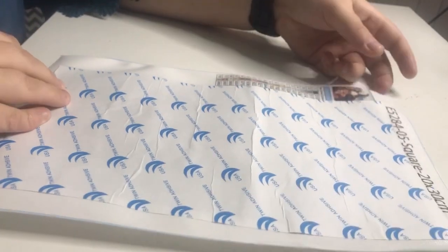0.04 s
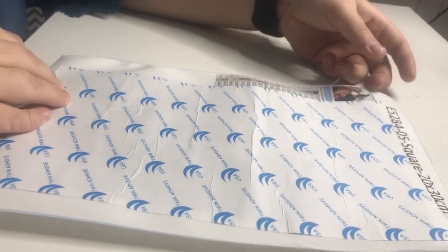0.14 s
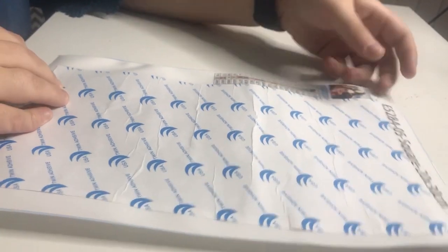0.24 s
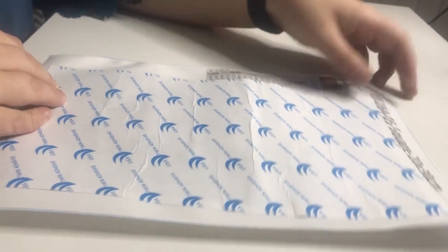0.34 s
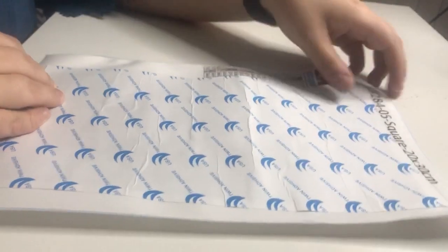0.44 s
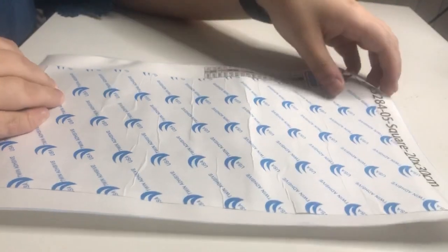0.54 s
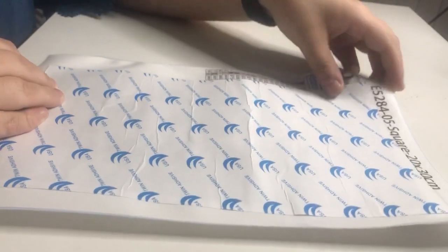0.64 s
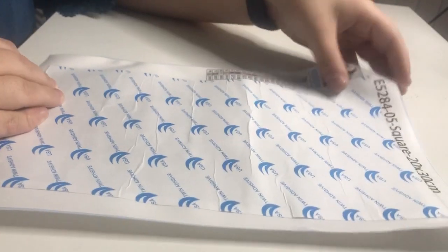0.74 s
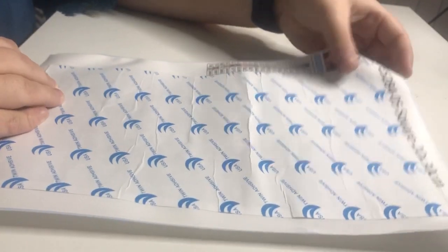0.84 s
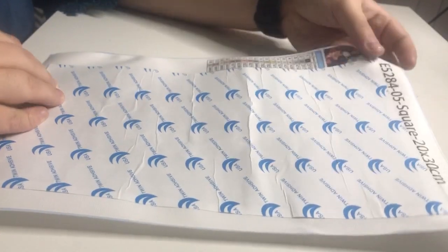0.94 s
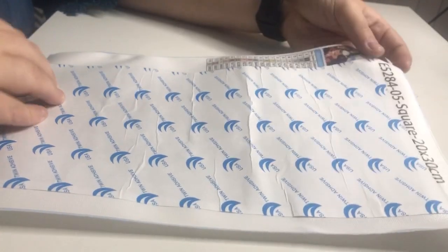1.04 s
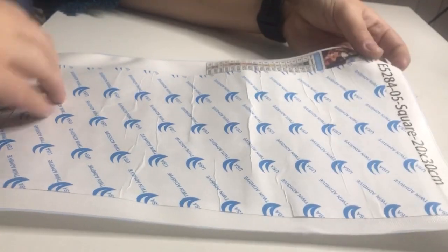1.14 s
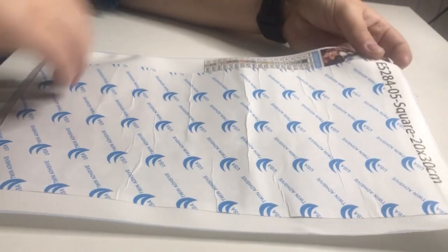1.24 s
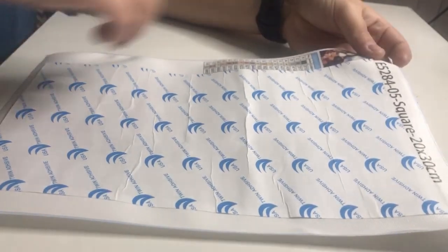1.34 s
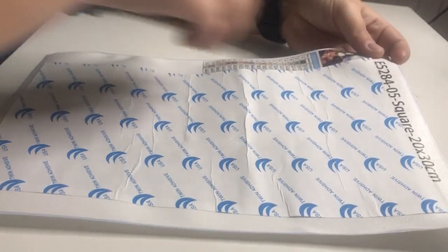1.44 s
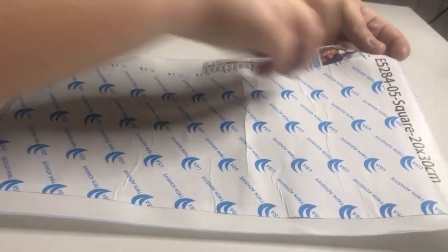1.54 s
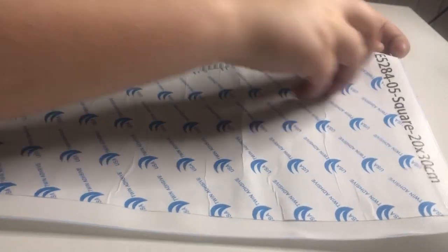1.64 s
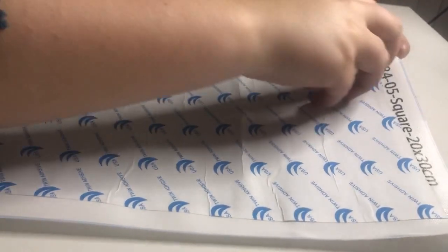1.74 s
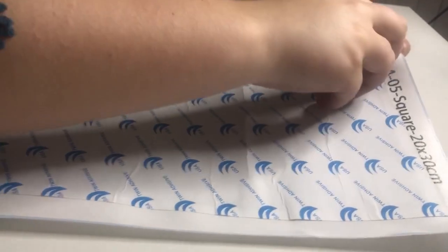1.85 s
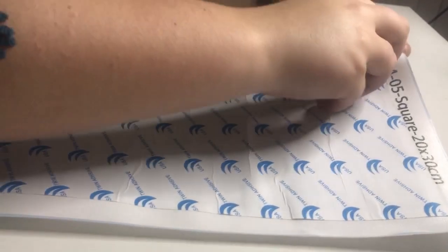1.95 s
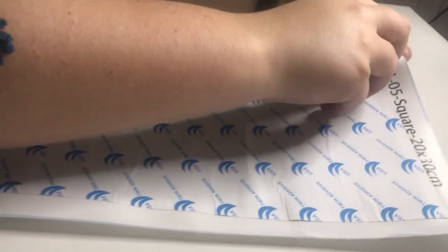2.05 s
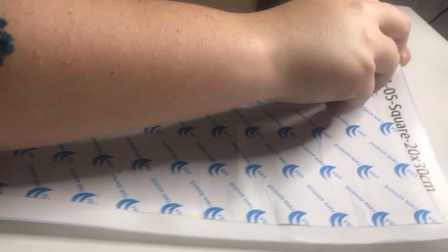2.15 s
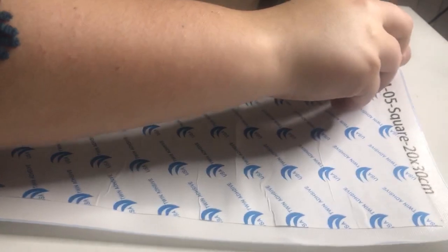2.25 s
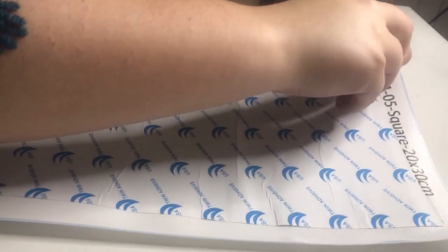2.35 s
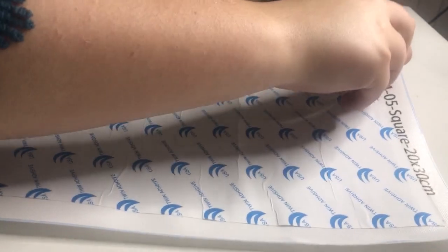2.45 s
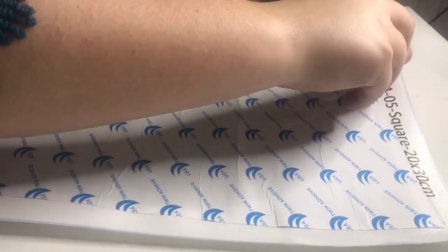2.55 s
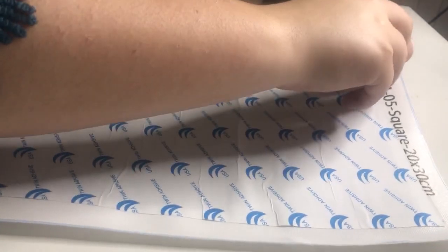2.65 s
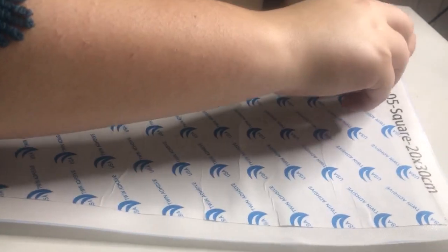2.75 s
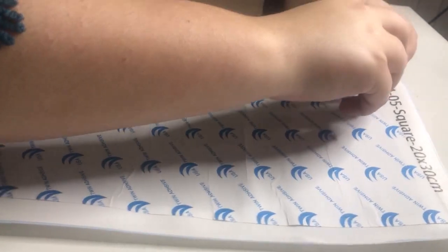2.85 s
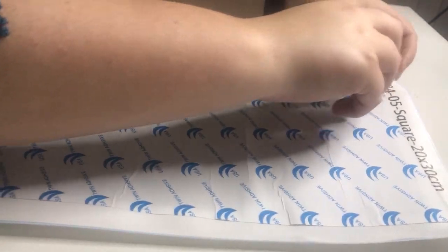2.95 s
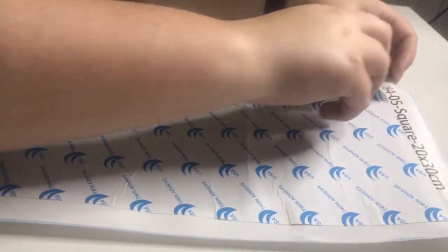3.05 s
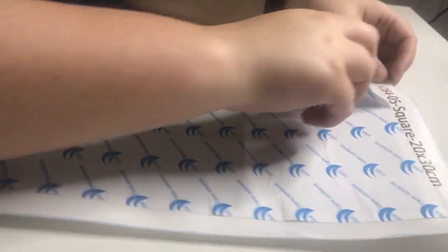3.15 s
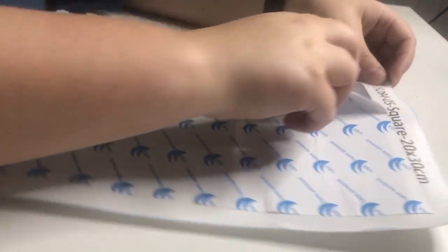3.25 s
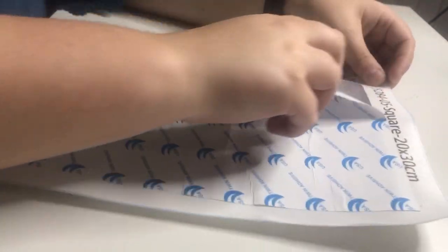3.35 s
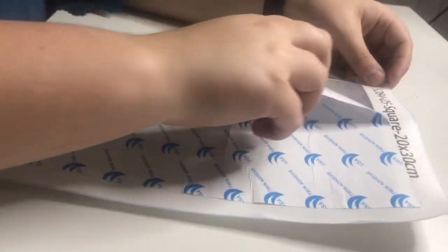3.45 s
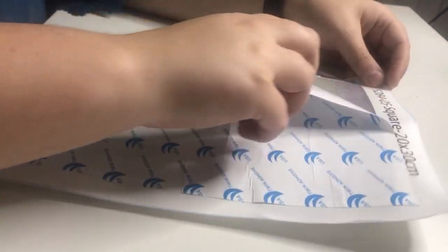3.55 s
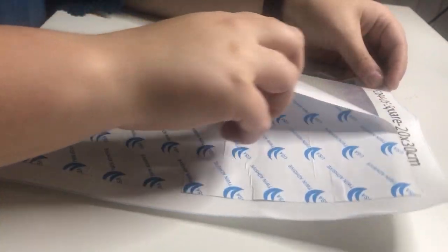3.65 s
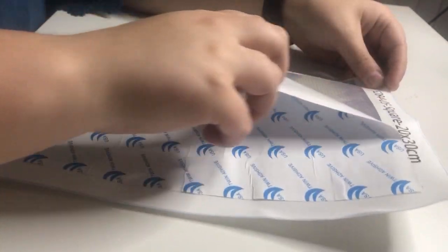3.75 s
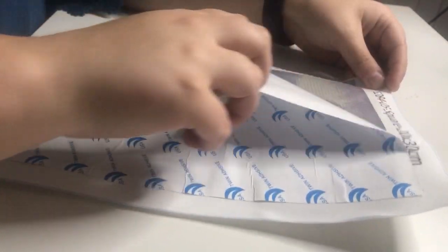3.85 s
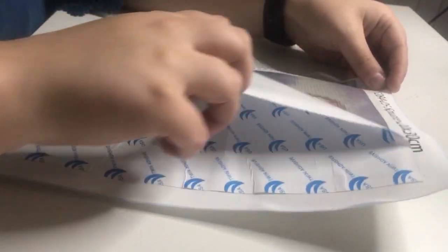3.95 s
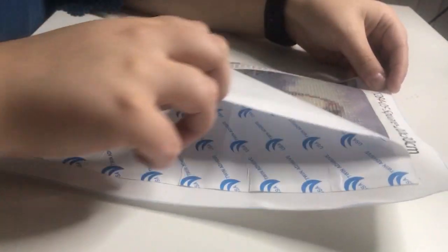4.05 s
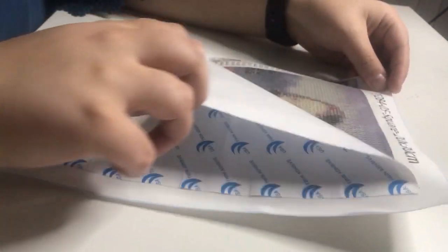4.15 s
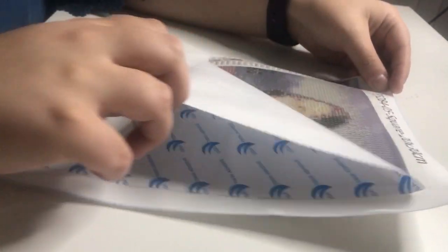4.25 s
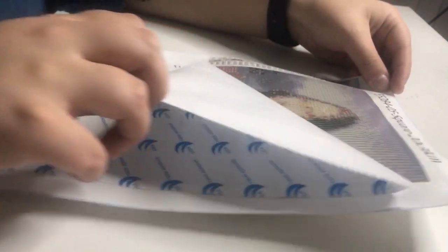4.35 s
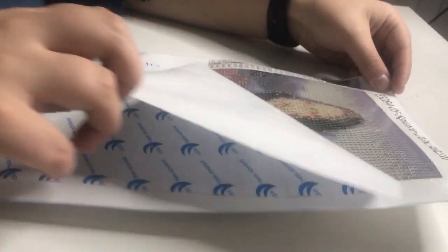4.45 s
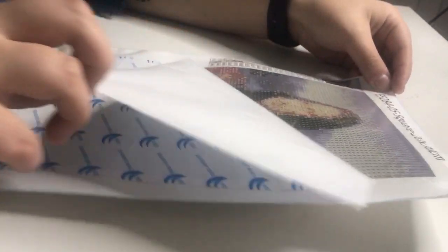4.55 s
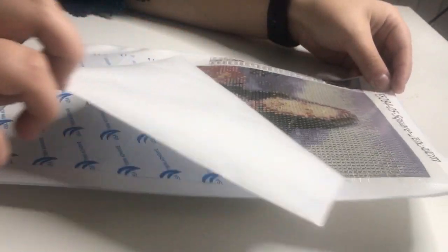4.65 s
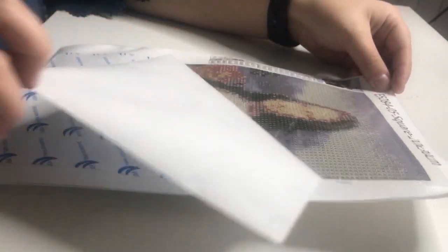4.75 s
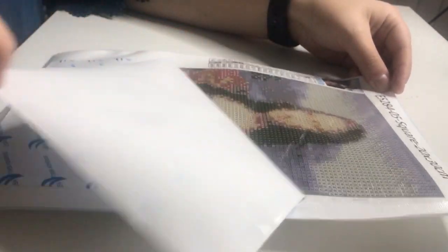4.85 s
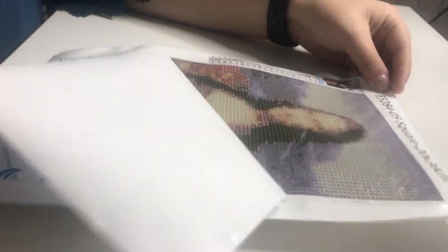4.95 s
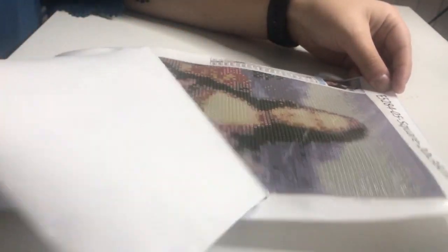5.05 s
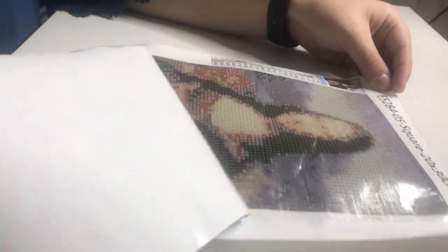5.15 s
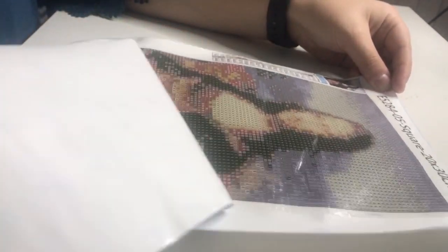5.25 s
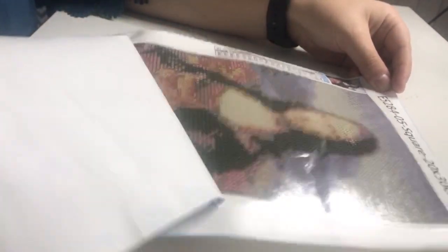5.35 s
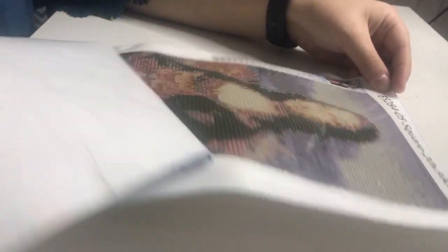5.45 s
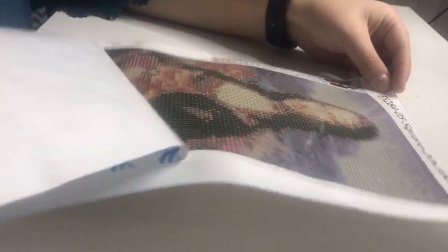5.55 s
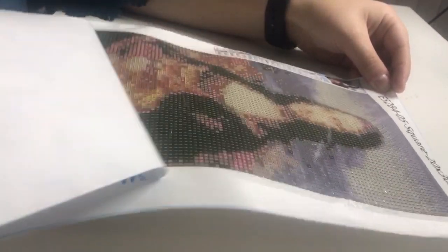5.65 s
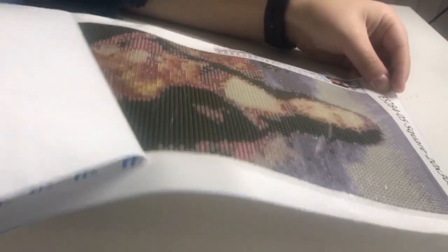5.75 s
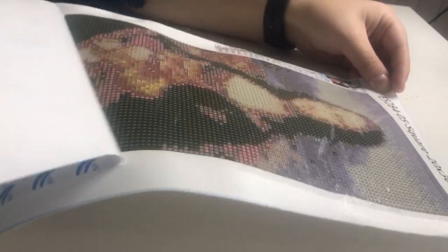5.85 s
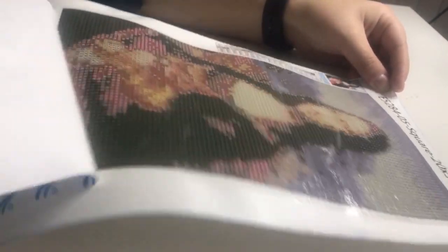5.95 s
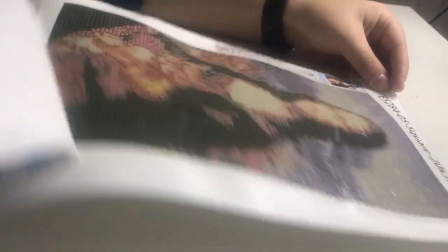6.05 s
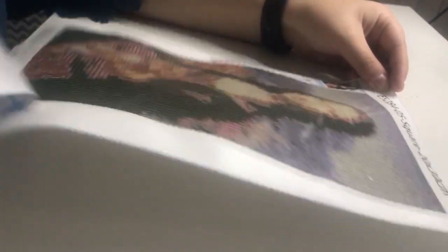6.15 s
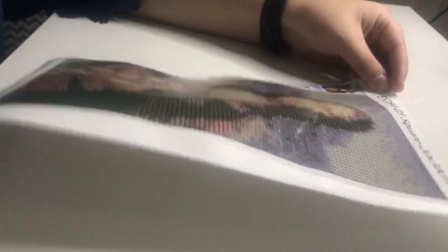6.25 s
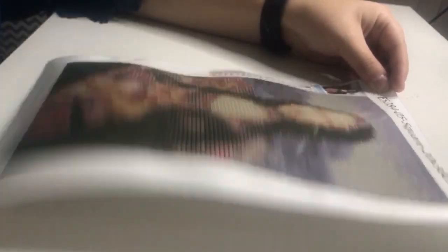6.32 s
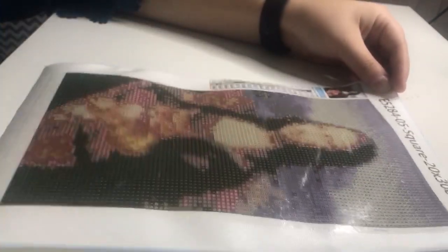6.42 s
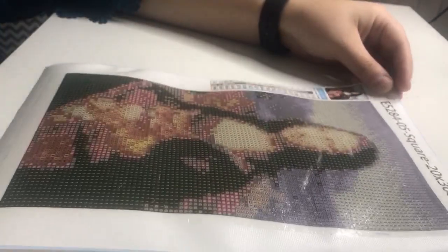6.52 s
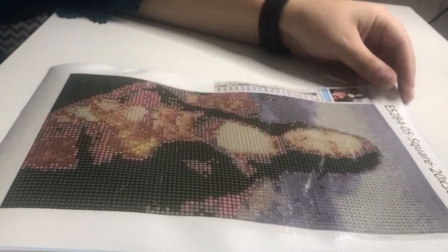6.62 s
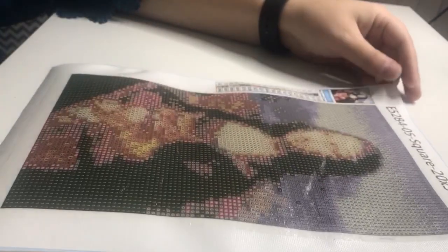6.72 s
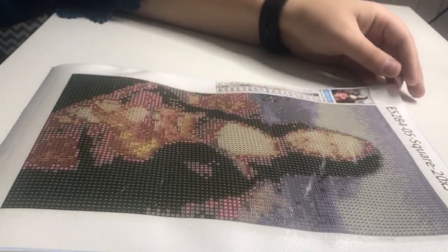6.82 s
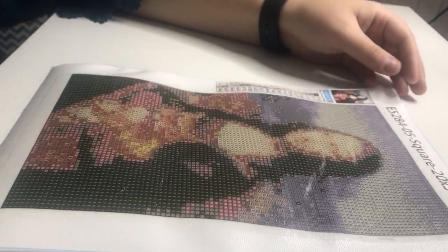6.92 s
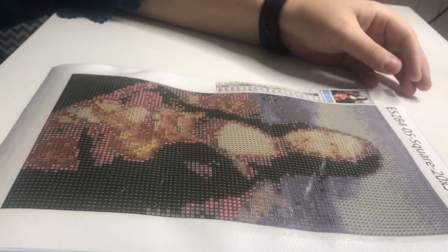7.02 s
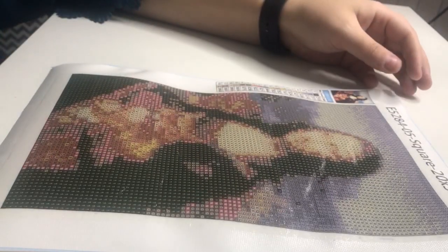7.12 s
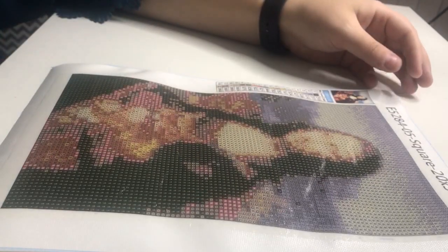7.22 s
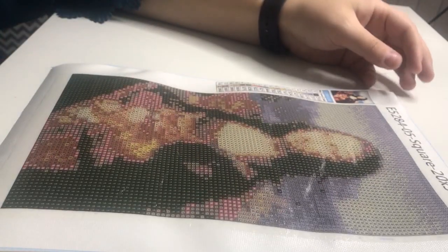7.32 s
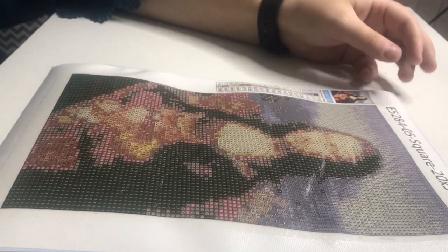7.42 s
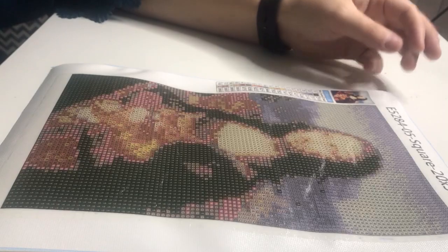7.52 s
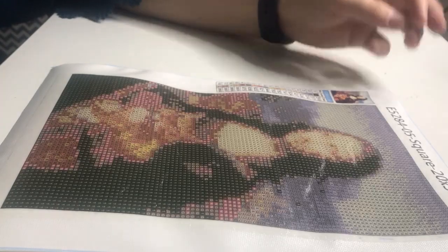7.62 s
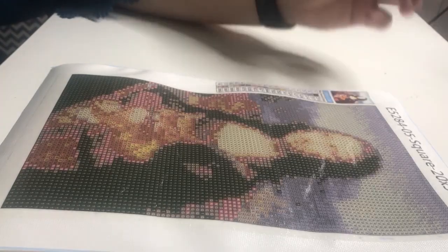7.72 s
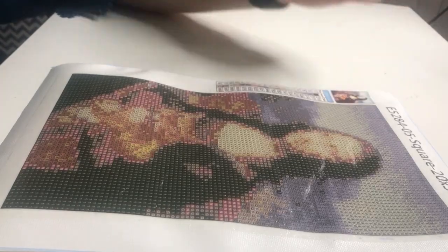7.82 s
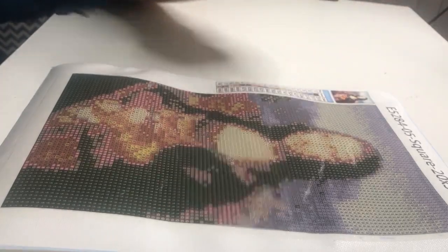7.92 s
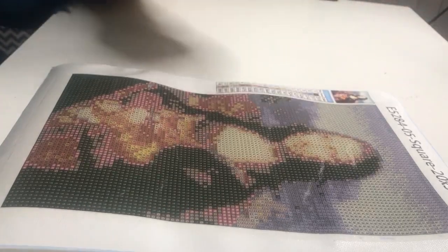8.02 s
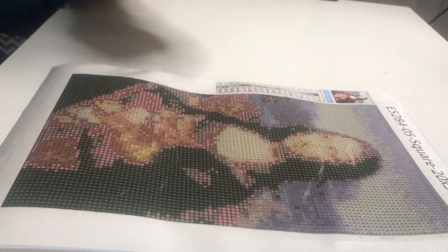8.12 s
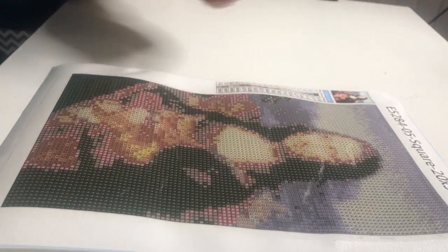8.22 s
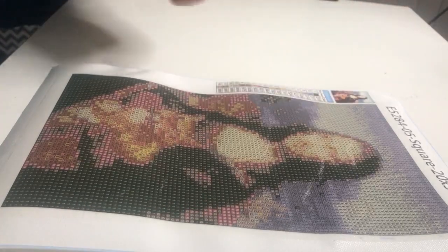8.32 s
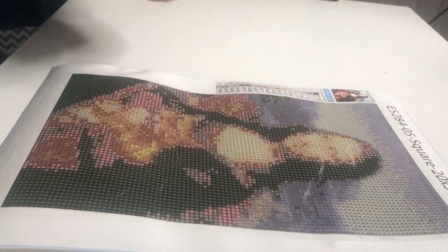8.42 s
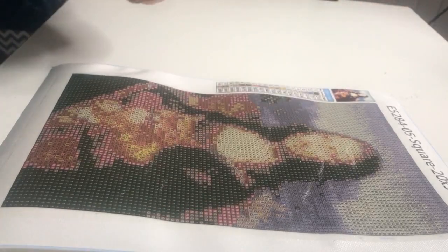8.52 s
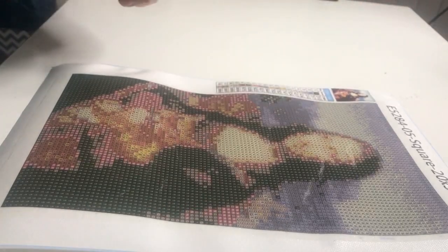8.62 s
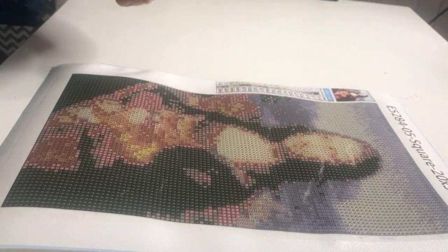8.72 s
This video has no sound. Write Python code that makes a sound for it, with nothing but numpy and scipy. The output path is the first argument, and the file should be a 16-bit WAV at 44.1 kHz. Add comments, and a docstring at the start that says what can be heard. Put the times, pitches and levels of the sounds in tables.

```python
"""A protective sheet is peeled off a glued canvas: stick-slip in the glue makes a crackle of tiny clicks.
Buckling adds sharp snaps, each a spike or a run of slips; the last edge tears free with a loud crack.
Before and after, hands slide, scuff and tap: shaped noise. Decaying sines make dull thuds on the table.
A small room answers with filtered noise echoes, over a faint machine hum; one microphone, close by."""
import sys
import numpy as np
from scipy import signal
from scipy.fft import rfft, irfft, next_fast_len
from scipy.io import wavfile
from scipy.ndimage import uniform_filter1d, map_coordinates

SR = 44100
rng = np.random.default_rng(int(sys.argv[2]) if len(sys.argv) > 2 else 0)


def transcribe(u):
    """Save the signal u as a 16-bit wav file named by the first command-line argument.

    u: samples, shape (n,) or (channels, n), limited to [-1, 1]; the rate is SR.
    q: integer samples, one column per channel.
    """
    v = np.clip(np.atleast_2d(u).T, -1, 1)
    q = np.round(v * 32767).astype(np.int16)
    wavfile.write(sys.argv[1], SR, q)


N = 387021  # length in samples


def amp(db):
    """Decibel law: level to amplitude gain."""
    return 10 ** (np.asarray(db) / 20)


def unit(x):
    """Normalisation: x at rms 1."""
    return x / np.sqrt(np.mean(x ** 2) + 1e-20)


def along(points, hz):
    """Logarithmic frequency axis: (Hz, value) points interpolated at hz."""
    freq_hz, value = np.transpose(points)
    return np.interp(np.log(hz + 1), np.log(freq_hz + 1), value)


def curves(rows):
    """Linear interpolation: one value per sample for each column after the time."""
    times, *columns = np.transpose(rows)
    return [np.interp(np.arange(N) / SR, times, column) for column in columns]


def wobble(rate):
    """Band-limited fluctuation: a smooth random curve with rate knots a second."""
    knots = rng.standard_normal(int(N * rate / SR) + 4)
    return map_coordinates(knots, [np.arange(N) * rate / SR])


def add(track, s, sound):
    """Superposition: mix a sound into the track at s seconds."""
    part = track[round(s * SR):][:len(sound)]
    part += sound[:len(part)]


def colour(x, points):
    """Minimum-phase filtering: the folded cepstrum gives a causal filter with the given spectrum."""
    size = 2 * next_fast_len(len(x) // 2 + 1024)
    cepstrum = irfft(np.log(amp(along(points, np.fft.rfftfreq(size, 1 / SR)))))
    cepstrum[1:size // 2] *= 2
    cepstrum[size // 2:] = 0
    return irfft(rfft(x, size) * np.exp(rfft(cepstrum)))[:len(x)]


def noise(points):
    """Stationary coloured noise of rms 1."""
    return unit(colour(rng.standard_normal(N), points))


def grains(rate, spread_db, ring_s, ring_db):
    """Random impulse process: tiny clicks of very uneven size, each with a short rattle after it."""
    unevenness = np.minimum(rng.standard_normal(N), 2)
    sizes = (rng.random(N) < rate / SR) * amp(spread_db * unevenness)
    fade = np.exp(-2 / (ring_s * SR))
    energy = signal.lfilter([1 - fade], [1, -fade], sizes ** 2)
    rattle = np.sqrt(energy) * rng.standard_normal(N)
    return unit(sizes * rng.choice([-1, 1], N) + amp(ring_db) * rattle)


def patchy(x, depth_db):
    """Local resonance: a gain drifting over time and frequency, as each slip meets another patch of sheet."""
    spectrum = signal.stft(x, nperseg=256)[2]
    field = rng.standard_normal(spectrum.shape)
    field = uniform_filter1d(field, size=8, axis=0)
    field = uniform_filter1d(field, size=4, axis=1)
    gain = unit(amp(depth_db * unit(field)))
    return signal.istft(spectrum * gain, nperseg=256)[1][:N]


# steady tones of motors and mains: pitch_hz [Hz], level_db [dB rms]
HUM_TONES = [(55.64, -68), (58.67, -63), (94, -77), (120, -68.5), (195.1, -81), (235.5, -76), (240, -74)]
# spectra of low rumble and of room noise: freq_hz [Hz], gain_db [dB]
RUMBLE_SPECTRUM = [(22, -32), (40, 12.5), (100, 6), (160, 2.5), (230, 9.5), (290, -6), (450, -38.5)]
ROOM_NOISE_SPECTRUM = [(170, -18.5), (300, 1.5), (700, -5.5), (1600, -16), (3100, -19.5), (7000, -25),
                       (15500, -30.5)]


def background(rumble_db=-65, hiss_db=-67):
    """Beating: two motors close in pitch throb against each other over mains hum and room noise."""
    t = np.arange(N) / SR
    hum = np.zeros(N)
    for k, (pitch_hz, level_db) in enumerate(HUM_TONES):
        hum += (-1) ** k * np.sqrt(2) * amp(level_db) * np.sin(2 * np.pi * pitch_hz * t)
    return hum + amp(rumble_db) * noise(RUMBLE_SPECTRUM) + amp(hiss_db) * noise(ROOM_NOISE_SPECTRUM)


# skin and sleeve slide on sheet and table:
# start_s [s], length_s [s], hiss_db [dB before hiss gain], rub_db [dB before rub gain]
STROKES = [(0, 2.43, -83, -78.5), (0.009, 0.051, -59.5, -78), (0.099, 0.041, -53, -75),
           (0.244, 0.051, -51.5, -74), (0.298, .11, -59.5, -76), (0.421, 0.049, -62.5, -73),
           (0.488, 0.039, -57, -78), (0.575, 0.1, -57.5, -82), (0.777, .18, -64.5, -69),
           (1.119, 0.17, -69, -72), (1.306, 0.089, -67.5, -71), (1.474, 0.26, -71.5, -69.5),
           (2.064, .11, -67, -70), (2.609, .24, -71, -68.5), (6.377, 0.079, -70, -66),
           (6.476, .03, -67, -59.5), (6.575, 0.071, -73, -62.5), (6.65, .22, -80, -80),
           (7.85, .11, -76, -83), (8.3, .47, -91, -82.5)]
# spectra of the fine skin hiss and of the duller rub: freq_hz [Hz], gain_db [dB]
SKIN_SPECTRUM = [(1200, -18.5), (2300, -6), (2950, 1), (3500, -3.5), (4600, -0.5), (7200, 1), (9000, -0.5),
                 (10500, -9), (15500, -15)]
RUB_SPECTRUM = [(300, -8), (800, -10.5), (1400, -4), (3000, -5.5), (12000, -23.5)]


def hands(hiss_gain_db=-1, rub_gain_db=1.5, half_rise_s=.012, release_s=.016):
    """Sliding friction: fine-grained skin hiss over a duller rub; each stroke swells, holds and fades."""
    t, hiss_power, rub_power = np.arange(N) / SR, np.zeros(N), np.zeros(N)
    for start_s, length_s, hiss_db, rub_db in STROKES:
        end_s = start_s + length_s
        corners = [start_s - half_rise_s, start_s + half_rise_s, end_s - half_rise_s, end_s + release_s]
        stroke = np.interp(t, corners, [0, 1, 1, 0])
        hiss_power += (amp(hiss_db + hiss_gain_db) * stroke) ** 2
        rub_power += (amp(rub_db + rub_gain_db) * stroke) ** 2
    grain = grains(rate=2500, spread_db=6.5, ring_s=.003, ring_db=6.5) * unit(amp(wobble(50)))
    hiss = np.sqrt(hiss_power) * unit(colour(grain, SKIN_SPECTRUM))
    return hiss + np.sqrt(rub_power) * unit(colour(grain, RUB_SPECTRUM))


# decay of the room: freq_hz [Hz], t60_s [s]
ROOM_DECAY = [(200, 0.41), (4000, 0.35), (14000, 0.15)]


def answer(early_db=-14, tail_db=-16, early_s=0.0095, spread_s=0.003):
    """Room impulse response: one cluster of near reflections, then a short diffuse tail."""
    hz, frames, spectrum = signal.stft(rng.standard_normal(SR // 3), SR, nperseg=256)
    decay = amp(-60 * frames / along(ROOM_DECAY, hz)[:, None])
    tail = signal.istft(spectrum * decay, SR, nperseg=256)[1]
    t = np.arange(len(tail)) / SR
    tail *= np.clip(t / 0.01, 0, 1)
    early = colour(rng.standard_normal(len(t)), [(200, -1), (1000, 2.5), (14000, -2.5)])
    early *= np.exp(-((t - early_s) / spread_s) ** 2 / 2)
    early = amp(early_db) * early / np.linalg.norm(early)
    return early + amp(tail_db) * tail / np.linalg.norm(tail)


def room(x):
    """Piecewise convolution: a fresh echo pattern each quarter second, so no fixed echo colours the sound."""
    out, step = np.zeros(N), SR // 4
    for start in range(0, N, step):
        add(out, start / SR, signal.fftconvolve(x[start:start + step], answer()))
    return out


# fingers tap and pick at the sheet:
# start_s [s], level_db [dB before level gain], treble_db [dB re level], contact_s [s]
TAPS = [(.0174, -58.5, 1.5, 0.0024), (.7632, -41.5, 2.5, 0.0031), (.864, -62, 3.5, 0.0036),
        (.948, -44.5, -4, .0019), (1.963, -59, -2, .0022), (2.157, -53.5, -3, 0.0024),
        (2.7104, -48.5, -19, .002), (6.5867, -51, -4, .0019), (7.4596, -53, -24, .007),
        (7.9407, -61.5, -5, .004)]
# spectrum of a tap on the sheet: freq_hz [Hz], gain_db [dB]
TAP_SPECTRUM = [(100, -9), (600, -2.5), (1000, -3.5), (1700, 2), (2700, -2), (4200, -2.5), (7000, 4.5),
                (10500, -6), (15500, -9)]


def taps(gain_db=29, settle_s=0.0012):
    """Contact excitation: a fingertip lands in a short scrape; a soft pad gives less treble than a nail."""
    out, t = np.zeros(N), np.arange(SR // 25) / SR
    for start_s, level_db, treble_db, contact_s in TAPS:
        scrape = rng.standard_normal(len(t)) * np.exp(-(t / (settle_s + contact_s)) ** 1.6)
        scrape = colour(scrape / np.linalg.norm(scrape), [(1700, 0), (6000, treble_db)])
        add(out, start_s, amp(level_db + gain_db) * colour(scrape, TAP_SPECTRUM))
    return out


# short drags of hand and arm across sheet and table:
# middle_s [s], level_db [dB rms before the swell], pitch_hz [Hz], length_s [s at half height]
SCUFFS = [(0.212, -58.5, 324, .05), (1.196, -66, 2800, 0.058), (1.348, -65, 2670, 0.049),
          (1.602, -65.5, 3340, 0.12), (1.79, -67, 1260, 0.057), (2.088, -62, 1410, 0.086),
          (3.15, -65.5, 338, 0.27), (6.273, -49.5, 3780, .03), (6.628, -61, 1100, .025)]


def scuffs():
    """Resonant friction: a brief drag sounds in one broad resonance, swelling and fading."""
    out = np.zeros(N)
    for middle_s, level_db, hz, length_s in SCUFFS:
        swell = np.hanning(round(2 * length_s * SR))
        resonance = [(hz / 4, -35), (hz / 1.4, -7), (hz, 0), (hz * 1.5, -6), (hz * 4, -28)]
        drag = colour(rng.standard_normal(len(swell)), resonance)
        add(out, middle_s - length_s, amp(level_db) * swell * unit(drag))
    return out


# soft bumps on the table: start_s [s], level_db [dB], pitch_hz [Hz], t60_s [s]
BUMPS = [(.366, -44, 190, 0.078), (0.371, -46.5, 85, 0.2), (6.331, -47, 70, .09), (6.521, -47.5, 480, 0.04)]


def bumps():
    """Damped mode: a hand or the falling canvas meets the table with a dull thud."""
    out, t = np.zeros(N), np.arange(SR // 4) / SR
    for start_s, level_db, pitch_hz, t60_s in BUMPS:
        # a slight random walk in phase blurs the pitch
        phase = 2 * np.pi * pitch_hz * t + 0.043 * np.cumsum(rng.standard_normal(len(t)))
        onset = 1 - np.exp(-t / 0.00067)
        add(out, start_s, amp(level_db - 60 * t / t60_s) * np.sin(phase) * onset)
    return out


# how hard the sheet is pulled; the hand rests briefly near 3.55 s: time_s [s], pull_db [dB]
PULL = [(2.6, -72), (2.9, -65), (3.08, -56.5), (3.49, -55.5), (3.54, -73), (3.61, -54.5), (3.72, -56.5),
        (4.04, -58), (4.4, -52.5), (4.66, -53), (4.94, -53), (5.08, -46.5), (5.48, -48), (5.66, -50.5),
        (5.75, -45.5), (5.96, -49), (6.28, -48), (6.37, -72)]
# surge around a snap: level re the snap (dB), half length (s), tearing time that sets it off in full (s)
SURGE_DB, SURGE_S, SURGE_TEAR_S = -13.5, 0.018, .003


def effort():
    """Energy addition: the crackle follows the steady pull plus a surge at each snap, fuller at slow tears."""
    t = np.arange(N) / SR
    pulling = (t > PULL[0][0]) * (t < PULL[-1][0])
    power = pulling * amp(curves(PULL)[0]) ** 2
    swell = np.hanning(round(4 * SURGE_S * SR))
    for start_s, level_db, _, _, tear_s in SNAPS:
        surge = amp(level_db + SURGE_DB) ** 2 * min(tear_s / SURGE_TEAR_S, 1)
        add(power, start_s - 2 * SURGE_S, surge * swell)
    return np.sqrt(power)


# how fast the peel line runs: time_s [s], speed [0-1]
SPEED = [(3.4, 0), (4.2, 0.5), (5.05, 0.72), (5.45, 1), (5.7, .9), (6.1, 0.58), (6.4, 0.1)]
# the canvas lifts off the table: time_s [s], body_db [dB re crackle before the crackle gain]
LIFT = [(3.3, -10), (5.1, -6), (5.5, -11), (6.17, -8), (6.28, 1.5)]
# spectra of the glue crackle and of the shaken sheet: freq_hz [Hz], gain_db [dB]
CRACKLE_SPECTRUM = [(1200, -37), (2200, 2.5), (3300, -5.5), (4500, 1.5), (8000, 2.5), (15500, -2.5)]
BODY_SPECTRUM = [(200, -15.5), (600, -12.5), (1400, -1), (1800, -6), (2400, -1.5), (3500, -5.5),
                 (6000, -60)]


def peel(crackle_gain_db=-1.5, slow_air_db=-6, speed_air_db=8, slow_mid_db=-4, speed_mid_db=5):
    """Stick-slip: glue yields in clumps of tiny clicks, denser and wider in spectrum the faster it is pulled."""
    speed = curves(SPEED)[0]
    rate = 750 + 1300 * speed ** 2  # clicks a second
    clumps = unit(amp(3.64 * wobble(130) + 0.4 * wobble(30)))
    clicks = clumps * grains(rate, spread_db=6.5, ring_s=.0012, ring_db=-2) / np.sqrt(rate)
    crackle = unit(colour(clicks, CRACKLE_SPECTRUM))
    air = signal.sosfiltfilt(signal.butter(2, 10000, "high", fs=SR, output="sos"), crackle)
    mid = signal.sosfiltfilt(signal.butter(2, 5000, "low", fs=SR, output="sos"), crackle)
    crackle = crackle + (amp(slow_air_db + speed_air_db * speed) - 1) * air
    crackle += (amp(slow_mid_db + speed_mid_db * speed) - 1) * mid
    # the same clicks shake the whole sheet
    body = amp(curves(LIFT)[0]) * unit(colour(clicks, BODY_SPECTRUM))
    return patchy(effort() * (amp(crackle_gain_db) * crackle + body), depth_db=3)


LEAD = 400  # samples of glue creep before a snap


def snap(db, body_db, air_db, tear_s, clean_s=.0008, ring_s=.0009, gain_db=29, creep_db=-16.5):
    """Buckling instability: a quick buckle is mostly one spike; a slower one tears through a run of slips."""
    t = np.arange(-LEAD, 2 * LEAD) / SR
    spike = .72 / (1 + (tear_s / clean_s) ** 2)  # its share of the energy
    grit = rng.standard_normal(len(t)) * amp(3 * rng.standard_normal(len(t)))
    slips = grit * (t > 0) * np.exp(-(np.abs(t) / (ring_s + tear_s)) ** 1.4)
    # the glue creeps for a moment before it gives
    creep = grit * (t < 0) * np.exp(-np.abs(t) / 0.0032)
    push = np.sqrt(1 - spike) * slips / np.linalg.norm(slips)
    push += amp(creep_db) * creep / np.linalg.norm(creep)
    push[LEAD] = np.sqrt(spike) * rng.choice([-1, 1])
    mid_db = 1.4 + 0.22 * body_db  # the middle of the spectrum follows the body
    shape = [(150, body_db - 7.0), (550, body_db - 8.5), (1200, body_db + 3.5), (1750, body_db),
             (2500, mid_db), (4800, -2.0), (8300, 1.25), (10500, air_db), (15500, air_db - 5.5)]
    return amp(db + gain_db) * colour(push, shape)


# the sheet buckles: start_s [s], level_db [dB before snap gain], body_db [dB re level],
# treble_db [dB re level], tear_s [s]
SNAPS = [(2.7965, -47.5, -8, 0.5, .0003), (2.8512, -54.5, 3, 0.5, 0.00045), (2.945, -43, -1, 0.5, .0008),
         (3.006, -44.5, 0, -0.5, .00035), (3.0454, -45.5, -1.5, -3.5, .00036),
         (3.1198, -39, -11, 2, .00034), (3.1744, -47, -14, 0, .0013), (3.2151, -43.5, -10, -3, .0026),
         (3.2293, -48, -24, 1, .0004), (3.2544, -42, -38, -1, .0005), (3.32, -45.5, -19, -6, .00012),
         (3.3648, -46.5, -26, -3, .0002), (3.4574, -41.5, -28, -4, .00015), (3.4758, -44.5, -22, -5, .0007),
         (3.582, -43, -16, -9, .0001), (3.5992, -40.5, -12, -7.5, .0002),
         (3.6242, -39.5, -12.5, -2, .00045), (3.7907, -49, -10, -1, .0018), (3.8686, -49, -11, 2, .001),
         (3.8831, -46.5, -2.5, -8, 0.00054), (3.951, -37.5, 2, -21, .001), (4.0988, -48, -23, 0.5, .00034),
         (4.2885, -39.5, 1.5, -7, .0023), (4.3388, -46, 5, 0.5, .0025), (4.3521, -43, -2, -2, .0007),
         (4.3839, -40, 7, 0, .0077), (4.4295, -42.5, -27, 1, .0002), (4.45, -42, -7, -7, .0018),
         (4.4613, -43.5, -8, -5, .0026), (4.4998, -42, -11, 0, .0026), (4.5475, -37.5, -28, -3.5, .0003),
         (4.5862, -36, -0.5, -1.5, .0016), (4.6814, -35, -4, -3.5, .0008), (4.697, -37, -8, -6.5, .0011),
         (4.7946, -34, -4, 1, .003), (4.825, -32.5, -14, 1.5, .0008), (4.8534, -37, -9, 0, .0004),
         (4.8929, -34.5, -14, 0, .0007), (4.9339, -38, -12, -3, .00036), (4.9687, -39.5, -3, -4, .0047),
         (4.985, -40, -3, 2, .0044), (5.0432, -33, -6, -5, .0039), (5.0803, -39.5, -16, -4, .0003),
         (5.1012, -40, -15.5, -2.5, .0007), (5.111, -39.5, -4, -1.5, .0031), (5.1247, -33.5, -4, -3, .0062),
         (5.148, -41.5, -6.5, 2.5, 0.00074), (5.214, -35, -11, -3, .0014), (5.324, -39.5, -5, 8, .004),
         (5.3669, -37, -11, -7, .0054), (5.44, -42.5, -6, 10.5, .0002), (5.4866, -41.5, -9, 9, .00023),
         (5.4973, -42.5, -1, -2, .0039), (5.5842, -36.5, -7, -1, .0067), (5.6002, -39, -5, 8, .0004),
         (5.7, -44.5, -6, 8.5, .0003), (5.836, -38.5, -18, -4, .0002), (5.8627, -38.5, -16, 3.5, .0003),
         (5.9179, -36, -9, -2, .0045), (6.0105, -38.5, -7.5, -15, .0053), (6.2906, -37, 4.5, -7, .0044),
         (6.3784, -48.5, -10.5, 1, .0017)]
# lesser snaps: rate (per s), level re the pull before snap gain (dB), its range (+-dB)
LESSER_RATE, LESSER_DB, LESSER_RANGE_DB = 46, .5, 4.2
# their body and treble while the peel is slow (dB), treble gain at full speed (dB), middling tear (s)
LESSER_BODY_DB, LESSER_AIR_DB, LESSER_SPEED_AIR_DB, LESSER_TEAR_S = -18, .5, 3, .00025
FUSE_DB = 2.5  # at full speed they sink into the hiss by this much


def snaps():
    """Random buckling: big snaps, and lesser ones as strong as the pull that stand out most when it is slow."""
    out = np.zeros(N)
    for start_s, level_db, body_db, air_db, tear_s in SNAPS:
        add(out, start_s - LEAD / SR, snap(level_db, body_db, air_db, tear_s))
    times, pull_db = np.transpose(PULL)
    gap_s = 1 / LESSER_RATE
    slots = np.arange(times[0] + gap_s, RELEASE_S - 2 * gap_s, gap_s)
    chances = rng.uniform(-1, 1, (len(slots), 5))
    for slot, (late, size, body, air, tear) in zip(slots, chances):
        start_s = slot + late * gap_s
        speed = np.interp(start_s, *np.transpose(SPEED))
        level_db = np.interp(start_s, times, pull_db) + LESSER_DB - FUSE_DB * speed + LESSER_RANGE_DB * size
        body_db = LESSER_BODY_DB + 9 * speed + 7 * body
        air_db = LESSER_AIR_DB + LESSER_SPEED_AIR_DB * speed ** 2 + 5 * air
        add(out, start_s - LEAD / SR, snap(level_db, body_db, air_db, LESSER_TEAR_S * 3 ** tear))
    return out


RELEASE_S = 6.3279  # the last edge lets go
# spectrum of the taut canvas slapping back: freq_hz [Hz], gain_db [dB]
SLAP_SPECTRUM = [(25, -37.5), (60, -6.5), (400, 4.5), (680, 5), (980, 8.5), (1300, 5.5), (1680, 5),
                 (2300, -9.5), (3200, -13.5), (4600, -19.5), (15000, -27)]


def release(crack_db=-23, crack_t60=0.018, slap_db=8, trip_s=0.00108, rebound=0.29):
    """Wave reflection: the edge cracks free, the canvas whips back and the jolt bounces to and fro in it."""
    out, t = np.zeros(N), np.arange(SR // 10) / SR
    crack = colour(rng.standard_normal(len(t)), [(700, -1), (3000, 14.0), (15000, -13.5)])
    add(out, RELEASE_S, amp(crack_db - 60 * t / crack_t60) * crack)
    # a faint flutter builds up behind the jolt
    jolts = amp(-36 - 60 * t / .04) * np.clip(t / .004, 0, 1) * rng.standard_normal(len(t))
    for k in range(3):
        add(jolts, k * trip_s, np.array([-rebound ** k]))
    add(out, RELEASE_S + trip_s, amp(slap_db) * colour(jolts, SLAP_SPECTRUM))
    return out


def scene():
    """Superposition: everything on the table, its room answer and the background."""
    table = patchy(snaps() + taps(), depth_db=1.3)
    table = table + peel() + hands() + scuffs() + release() + bumps()
    return (table + room(table) + background())[None]


# resonances of the microphone port: freq_hz [Hz], gain_db [dB]
PORT = [(4200, -0.5), (4900, -1), (5700, 0), (7500, -2), (8500, 0), (10400, -1.5), (11200, 1.5)]
TOP_HZ = 16000  # band limit


def record(dry):
    """Linear filtering: the microphone port colours the treble; nothing is kept above the band limit."""
    size = next_fast_len(N + SR // 2)
    hz = np.fft.rfftfreq(size, 1 / SR)
    response = amp(along(PORT, hz)) * (hz < TOP_HZ)
    return irfft(rfft(dry, size) * response, size)[:, :N]


dry = scene()
out = record(dry)
transcribe(out)
```